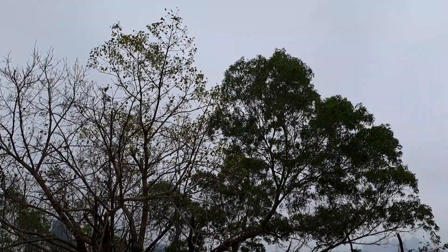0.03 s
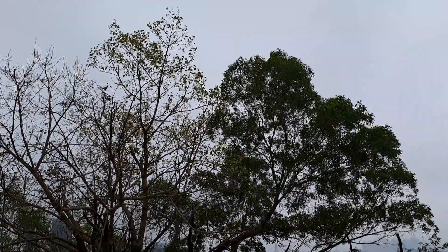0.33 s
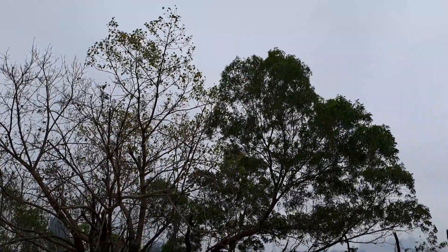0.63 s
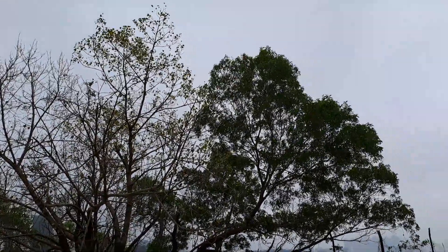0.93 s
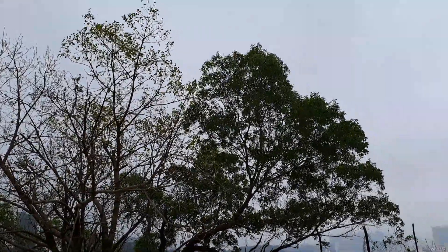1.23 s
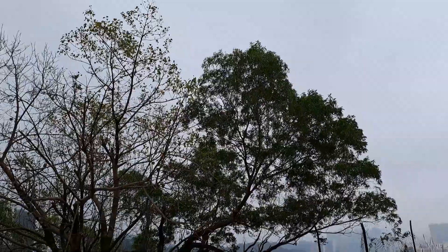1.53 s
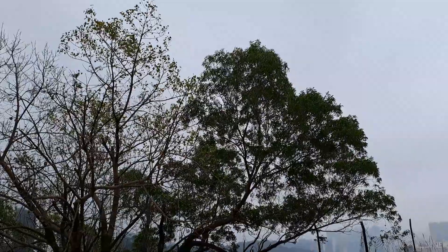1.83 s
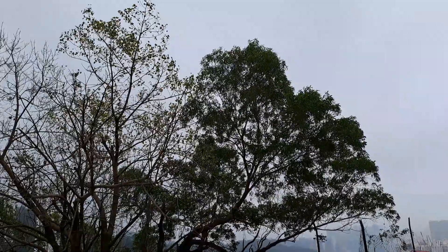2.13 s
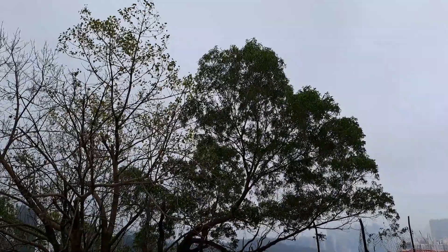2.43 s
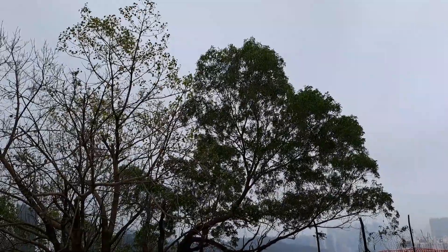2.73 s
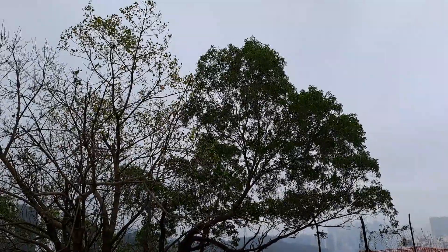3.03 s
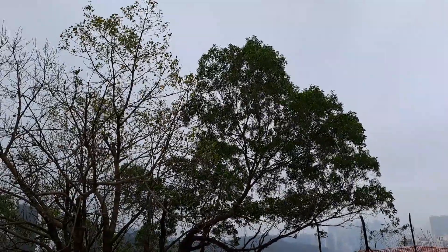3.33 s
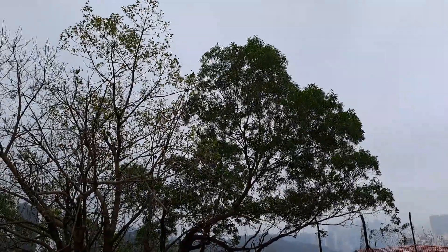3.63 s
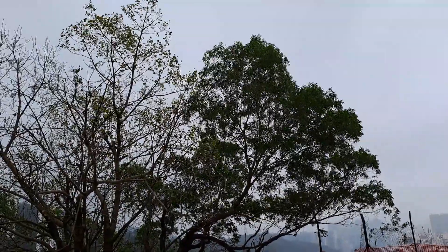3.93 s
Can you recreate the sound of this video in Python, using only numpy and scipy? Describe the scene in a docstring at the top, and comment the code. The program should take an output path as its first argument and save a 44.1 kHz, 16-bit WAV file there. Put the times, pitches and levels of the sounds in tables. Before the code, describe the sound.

Low, gusty wind buffets a hand-held microphone outdoors while leaves hiss and far traffic and an engine drone on. Faint crackles and handling ticks come before one hard gust; the wind then weakens and a vehicle draws nearer.

```python
"""On a hillside with trees above a town, far traffic roars softly over a heavy engine's drone.
A breeze hisses in the leaves and buffets the two microphone ports of a hand-held camera.
Around one second a far machine whines, fingers brush and tick on the case, dry leaves crackle
and a small bird calls faintly. At two seconds the strongest eddy hits the left port and ducks the
limiter; the bird calls again. The level dips briefly a few times, and one vehicle swells at the end."""
import sys
import numpy as np
from scipy import signal
from scipy.fft import rfft, irfft, next_fast_len
from scipy.io import wavfile
from scipy.ndimage import uniform_filter1d, minimum_filter1d, map_coordinates

SR = 44100
rng = np.random.default_rng(int(sys.argv[2]) if len(sys.argv) > 2 else 0)


def inscribe(sig):
    """Save sig as 16-bit PCM at rate SR to the path in sys.argv[1].

    A 1-D sig is mono; a 2-D sig holds one channel per row.
    Samples are clipped to [-1, 1] before scaling.
    """
    pcm = np.round(np.clip(np.atleast_2d(sig).T, -1, 1) * 32767)
    wavfile.write(sys.argv[1], SR, pcm.astype(np.int16))


N = 176400
TIME_S = np.arange(N) / SR


def amp(db):
    """Decibels to gain."""
    return 10 ** (np.asarray(db) / 20)


def unit(x):
    """Scaled to rms 1."""
    return x / np.sqrt(np.mean(x ** 2) + 1e-20)


def along(points, hz):
    """Read (freq_hz, value) points on a log frequency axis."""
    freqs, values = np.transpose(points)
    return np.interp(np.log(hz + 1), np.log(freqs + 1), values)


def eq(points):
    """A frequency response through (freq_hz, gain_db) points."""
    return lambda hz: amp(along(points, hz))


def fader(rows):
    """One value per sample for each column after the time."""
    times, *columns = np.transpose(rows)
    return np.array([np.interp(TIME_S, times, column) for column in columns])


def wobble(rate_hz):
    """A smooth random curve with rate_hz knots a second."""
    return map_coordinates(rng.standard_normal(SR // 10), [TIME_S * rate_hz + 2], mode="wrap")


def pan(pan_db):
    """Left and right gains; pan_db is always left minus right."""
    return amp(np.array([[.5], [-.5]]) * pan_db)


def filtered(x, response):
    """x shaped by a frequency response."""
    size = next_fast_len(N + SR // 2)
    return irfft(rfft(x, size) * response(np.fft.rfftfreq(size, 1 / SR)), size)[..., :N]


def noise(colour):
    """Steady coloured noise of rms 1, independent left and right."""
    return unit(filtered(rng.standard_normal((2, N)), colour))


# Stereo image of far sound at the two ports: freq_hz, correlation
FAR_IMAGE = [(200, 0.97), (400, 0.67), (720, 0.35), (900, -0.24), (1050, -0.0074), (1250, -0.79),
             (1700, -0.55), (2200, 0.44), (3000, -0.27), (3600, 0.16), (4700, -0.27), (5900, 0.35),
             (6800, -0.12), (8000, -0.016)]

def rush(colour, patchy_db, image=FAR_IMAGE):
    """Coloured stereo noise of rms 1, its gain mottled over time and frequency."""
    spectra = signal.stft(rng.standard_normal((2, N)), nperseg=1024)[2]
    patches = uniform_filter1d(rng.standard_normal(spectra.shape[1:]), size=5, axis=0)
    patches = unit(uniform_filter1d(patches, size=12, axis=1))
    pair = signal.istft(spectra * amp(patchy_db * patches), nperseg=1024)[1][:, :N]
    spread = lambda hz: np.arccos(np.clip(along(image, hz), -1, 1)) / 2
    mid, side = filtered(pair, lambda hz: colour(hz) * [np.cos(spread(hz)), np.sin(spread(hz))])
    return unit(np.array([mid + side, mid - side]))


def whine(pitch_hz, half_width_hz, patchy_db):
    """A fuzzy tone made of narrow-band stereo noise."""
    return rush(lambda hz: 1 / (1 + ((hz - pitch_hz) / half_width_hz) ** 2), patchy_db)


# Ebb and flow of the traffic bed, before its trim: time_s, level_db
TRAFFIC_FADER = [(0, -39.5), (.75, -44.5), (.95, -40), (1.2, -41), (2.0, -41), (2.4, -43.5), (2.47, -45),
                 (2.72, -43), (2.92, -44.5), (3.3, -43), (3.55, -43.5), (4, -42.5)]
# Dark tone of tyres on the road: freq_hz, gain_db
TRAFFIC_EQ = [(120, -8.5), (280, 1), (390, 2), (490, -3.5), (620, -4.5), (730, -5), (880, -7.5),
              (1100, -10), (1450, -7.5), (1750, -11.5), (2300, -14.5), (2700, -19), (3400, -18.5),
              (4000, -25), (4600, -23), (6200, -25.5), (8500, -42), (12000, -51), (15500, -52)]
# The roar leans left: freq_hz, pan_db
TRAFFIC_PAN = [(300, 2), (1200, 1), (2300, 1), (5000, 1), (8000, 0.5), (15000, 11.5)]

def traffic(trim_db=3):
    """The blended tyre roar of far roads."""
    roar = rush(eq(TRAFFIC_EQ), patchy_db=1.14)
    roar = filtered(roar, lambda hz: pan(along(TRAFFIC_PAN, hz)))
    return roar * amp(trim_db + fader(TRAFFIC_FADER) + 0.46 * wobble(14))


# The heavy engine slowly sinks away: time_s, level_db
ENGINE_FADER = [(0, -25), (.6, -28.5), (1.1, -25.5), (1.8, -26), (2.05, -30.5), (2.35, -29), (2.5, -34),
                (2.85, -33), (3.05, -30.5), (3.6, -33.5), (4, -36)]
# Partials of its drone: pitch_hz, width_hz, gain_db, pan_db
ENGINE_PARTIALS = [(51.55, 12.6, 0.5, 0.5), (83, 11.7, -8.5, 7), (170.8, 5.7, -17.5, 7),
                   (341.2, 4, -19.5, 4), (541, 5.5, -25.5, 6)]

def engine(stereo_spread=0.73):
    """A far engine drones on a few unsteady partials that swell a little differently at each port."""
    def partials(hz):
        return sum(amp(db) * pan(pan_db) * np.exp(-((hz - pitch) / (.5 * width)) ** 2) / np.sqrt(width)
                   for pitch, width, db, pan_db in ENGINE_PARTIALS)
    drive = rng.standard_normal(N) + stereo_spread * rng.standard_normal((2, N))
    return unit(filtered(drive, partials)) * amp(fader(ENGINE_FADER))


# The leaf hiss swells with the breeze, then drops suddenly near 2.43 s
# as the recorder turns it down: time_s, level_db
LEAVES_FADER = [(0, -51), (.24, -46), (.4, -48.5), (.77, -48), (.83, -46), (1.15, -49), (1.55, -48.5),
                (2.0, -49), (2.41, -46.5), (2.46, -54), (3.3, -56), (4, -53)]
# Airy tone of the leaves: freq_hz, gain_db
LEAVES_EQ = [(600, -1), (1200, 0.5), (1800, 0.5), (2230, -8), (2600, -1.5), (3400, -6.5), (3900, -10),
             (4500, -6.5), (5200, -26), (6200, -13), (6800, -27), (7500, -10.5), (8500, -41), (12000, -22),
             (15500, -46)]
# Where each band of their hiss sits: freq_hz, pan_db
FOLIAGE_PAN = [(1100, 3.5), (2100, -12), (3000, -8), (4000, -3.5), (7000, -2), (13000, 7)]

def leaves():
    """The breeze hisses in the leaves and sings unsteadily in the twigs to the right."""
    hiss = rush(eq(LEAVES_EQ), patchy_db=1.9)
    hiss = filtered(hiss, lambda hz: pan(along(FOLIAGE_PAN, hz)))
    twigs = whine(pitch_hz=2170, half_width_hz=175, patchy_db=0) * pan(-9.5)
    twigs *= amp(-5.5 + 2.5 * wobble(8.3))
    return (hiss + twigs) * amp(fader(LEAVES_FADER) + 0.81 * wobble(18))


# Gusts on the ports: time_s, left_db, right_db
GUST_FADER = [(0, -27.5, -29.5), (.2, -24, -22), (.38, -22.5, -24.5), (.52, -26, -22.5), (.68, -24.5, -23),
              (.9, -26, -28), (1.1, -22.5, -23), (1.35, -27.5, -24.5), (1.55, -25, -27), (1.9, -23.5, -28),
              (2.08, -21.5, -25), (2.2, -20, -19.5), (2.38, -22, -18), (2.47, -30, -24.5),
              (2.72, -25, -28.5), (2.82, -29.5, -29.5), (2.96, -27.5, -27.5), (3.2, -29, -29),
              (3.37, -27, -25.5), (3.48, -31, -28.5), (3.62, -31.5, -25), (3.75, -35.5, -32),
              (4, -36, -29.5)]
# Deep body of the wind: freq_hz, gain_db
RUMBLE_EQ = [(20, -42), (33, -2), (48, -5.5), (62, -0.5), (82, -0.5), (110, -3), (150, -6), (220, -11.5),
             (300, -25), (420, -31), (700, -37.5), (1500, -45), (4000, -100)]
# Low-mid flutter of finer turbulence: freq_hz, gain_db
FLUTTER_EQ = [(100, -34), (200, -2), (270, 0), (380, -8.5), (700, -17), (1500, -48), (4000, -80)]
# Stereo image of the wind: freq_hz, correlation
WIND_IMAGE = [(40, 0.63), (80, 0.49), (150, 0.39), (300, 0.35)]

def buffeting(lump_db=1.08, strong_gust_db=-21, flutter_growth=1.17):
    """Lumpy turbulence on each port; flutter grows faster than rumble, so strong gusts are brighter."""
    gust_db = fader(GUST_FADER)
    shared = wobble(21.98)
    per_port = np.array([wobble(29.98), wobble(29.86)])
    lumps = amp(lump_db * (shared + 0.39 * per_port))
    rumble = unit(lumps * rush(eq(RUMBLE_EQ), patchy_db=-0.57, image=WIND_IMAGE))
    flutter = unit(lumps * rush(eq(FLUTTER_EQ), patchy_db=1.5, image=WIND_IMAGE))
    flutter_db = -34.5 + flutter_growth * (gust_db - strong_gust_db)
    return rumble * amp(gust_db) + flutter * amp(flutter_db)


# Bright noise floor: freq_hz, gain_db
MIC_HISS_EQ = [(2000, -4.5), (5000, 1), (8000, 2), (12000, -3), (13500, -5), (15500, -15)]

def mic_hiss():
    """The even hiss of the microphones, stronger on the left."""
    return amp(-61) * pan(3) * noise(eq(MIC_HISS_EQ))


# Single wind thumps: peak_s, left_db, right_db, pitch_hz, rise_and_fall_s
EDDY_THUMPS = [(.35, -16, -16, 69.4, 0.022), (.402, -25, -15.5, 134.5, 0.013),
               (.44, -16, -14.5, 103.4, .014), (.562, -26.5, -19.5, 148, 0.013),
               (1.005, -22, -13.5, 83.7, 0.013), (1.12, -17, -25, 120, 0.015),
               (1.289, -30, -14, 91.4, 0.019), (2.021, -0.6, -33, 90.6, 0.017),
               (2.097, -9.5, -27, 138, 0.014), (2.322, -28, -15.5, 154, .016), (2.54, -25, -23, 77, 0.0081),
               (2.713, -21.5, -20, 62.3, 0.027), (3.041, -21, -22, 61.5, .016),
               (3.2, -20, -18, 66.7, 0.025), (3.372, -21.5, -18, 66, 0.019), (3.518, -23, -25, 62, .014),
               (3.618, -27, -16, 76.5, 0.0094), (3.676, -22.5, -31, 160, 0.0053),
               (3.748, -23, -27, 80, 0.0055), (3.854, -22, -25, 71, 0.0085)]

def eddies(sharpness=0.34, pitch_wander=0.198):
    """Each short whirl of air thumps the ports in a few pointed, uneven pushes."""
    out = np.zeros((2, N))
    whirl_s = np.cumsum(1 + pitch_wander * wobble(70)) / SR
    for peak_s, left_db, right_db, pitch_hz, rise_and_fall_s in EDDY_THUMPS:
        turn = np.exp(2j * np.pi * pitch_hz * (whirl_s - whirl_s[round(peak_s * SR)]))
        pushes = np.real(turn / (1 - sharpness * turn))  # harmonics sharpen each crest
        swell = np.exp(-np.abs(TIME_S - peak_s) / rise_and_fall_s)
        out += amp([[left_db], [right_db]]) * swell * pushes
    return out


# A far machine drifts in and out: time_s, level_db
MACHINE_FADER = [(0, -67), (.7, -67), (.92, -49.5), (1.7, -55), (2.1, -61), (3.6, -74), (3.84, -57),
                 (4, -55)]

def machine():
    """A thin whine to the left that comes and goes on the wind."""
    tone = whine(pitch_hz=1358, half_width_hz=26, patchy_db=1.5)
    return tone * pan(6.5) * amp(fader(MACHINE_FADER))


# Soft finger strokes: peak_s, level_db, half_length_s
FINGER_BRUSHES = [(.862, -61, .012), (0.915, -66, .05), (1.995, -63, .01), (2.78, -65, 0.015)]
# Silky top of skin sliding on the case: freq_hz, gain_db
SKIN_EQ = [(4000, -17), (8000, -9), (12000, 5), (15500, 3)]
# Finger ticks: start_s, peak_db, pan_db
FINGER_TICKS = [(.866, -43, -5), (1.385, -48, -6), (1.62, -52, 7), (1.9862, -29.5, -5), (1.9945, -43, -2)]
# Crisp tone of the tapped case: freq_hz, gain_db
CASE_EQ = [(3000, -18), (6200, -1), (8000, -9), (10300, 1), (12000, -2), (15500, -15)]

def fingers(tick_decay_s=0.00053):
    """Fingers brush softly and tick on the camera's case."""
    # One snap, built at 1 s and slid to each tick.
    snap = rng.standard_normal((2, N)) * (TIME_S >= 1) * np.exp(-np.abs(TIME_S - 1) / tick_decay_s)
    snap = filtered(snap, eq(CASE_EQ))
    snap /= np.abs(snap).max()
    ticks = sum(amp(db) * pan(pan_db) * np.roll(snap, round((start_s - 1) * SR), axis=1)
                for start_s, db, pan_db in FINGER_TICKS)
    strokes = sum(amp(db) * np.exp(-.5 * ((TIME_S - peak_s) / half_length_s) ** 2)
                  for peak_s, db, half_length_s in FINGER_BRUSHES)
    return ticks + strokes * pan(-4) * noise(eq(SKIN_EQ))


# Dry leaf accents: start_s, level_db, pan_db, decay_s
LEAF_CRACKLES = [(.932, -39, 2, 0.01), (.973, -47, -6, .012), (1.108, -45, 2, .005), (1.615, -43, 1, 0.022),
                 (2.764, -44, 4, .012)]
# Their papery midrange: freq_hz, gain_db
CRACKLE_EQ = [(700, -15), (1200, 5), (2200, 1), (3000, -3), (4500, -13), (8000, -29), (15500, -44)]

def crackles():
    """Dry leaves crackle in the gusts, each a sudden burst that dies fast."""
    bursts = sum(amp(db) * pan(pan_db) * (TIME_S >= start_s) * np.exp(-np.abs(TIME_S - start_s) / decay_s)
                 for start_s, db, pan_db, decay_s in LEAF_CRACKLES)
    return bursts * noise(eq(CRACKLE_EQ))


# Two faint chirps: start_s, length_s, start_hz, end_hz, level_db
BIRD_CALLS = [(0.998, .14, 8260, 6960, -66), (2.2, 0.17, 7900, 7300, -63.5)]

def bird():
    """A small bird's thin falling calls, blurred by the trees."""
    out = np.zeros((2, N))
    for start_s, length_s, start_hz, end_hz, db in BIRD_CALLS:
        progress = np.clip((TIME_S - start_s) / length_s, 0, 1)
        phase = 2 * np.pi * np.cumsum(start_hz + (end_hz - start_hz) * progress) / SR
        blur = 2 * np.array([wobble(800), wobble(800)])
        out += amp(db) * np.sin(np.pi * progress) * np.sin(phase) * blur
    return out


# Quick dips in the bass beds: centre_s, depth_db, half_length_s
LEVEL_DIPS = [(2.467, 5, 0.017), (2.659, 17, 0.012), (2.809, 11, 0.036), (3.103, 5.5, 0.016),
              (3.572, 9, .01), (3.708, 6, 0.012)]

def dips():
    """The level sinks briefly and comes back; gives the depth in dB at each sample."""
    return sum(depth_db * np.exp(-.5 * ((TIME_S - centre_s) / half_length_s) ** 2)
               for centre_s, depth_db, half_length_s in LEVEL_DIPS)


# The nearer vehicle's closing swell: time_s, level_db
VEHICLE_FADER = [(0, -66), (3.2, -58), (3.55, -51.5), (3.77, -44), (3.85, -39), (3.94, -40), (4, -37)]
# Resonances that colour its roar: pitch_hz, width_hz, gain_db
VEHICLE_RESONANCES = [(301, 20, 8.5), (496, 60, -0.5), (643, 58, -6), (775, 44, -6.5), (1000, 150, -6),
                      (1400, 180, -3), (1630, 160, -5.5), (2060, 200, -13), (2820, 340, -13),
                      (3500, 220, -20)]
# Its tyres whine as it comes close: time_s, level_db
TYRE_FADER = [(3.1, -82), (3.76, -56), (3.85, -46), (3.93, -37), (4, -43)]

def vehicle(air_cutoff_hz=5200):
    """One vehicle draws nearer with a resonant roar and a tyre whine; the air takes its treble."""
    def colour(hz):
        power = sum(amp(db) ** 2 / (1 + ((hz ** 2 - pitch ** 2) / (hz * width + 1)) ** 2)
                    for pitch, width, db in VEHICLE_RESONANCES)
        return np.sqrt(power / (1 + (hz / air_cutoff_hz) ** 4))
    roar = rush(colour, patchy_db=3.5) * amp(fader(VEHICLE_FADER) + 1.1 * wobble(16))
    tyres = whine(pitch_hz=747, half_width_hz=98, patchy_db=3) * amp(fader(TYRE_FADER))
    return roar + tyres


def scene(low_cut_hz=34, far_dip_share=0.28):
    """The mix at the two ports; the microphones pass little of the bass below the low cut."""
    dip_db = dips()
    far = (traffic() + vehicle() + machine() + leaves()) * amp(-far_dip_share * dip_db)
    bass = (engine() + buffeting()) * amp(-dip_db) + eddies()
    bass = filtered(bass, lambda hz: hz ** 4 / np.sqrt(hz ** 8 + low_cut_hz ** 8))
    return far + bass + crackles() + fingers() + bird() + mic_hiss()


def record(dry):
    """A limiter ducks at once and recovers slowly; nothing passes above the band limit."""
    ceiling, release_db_per_s, band_limit_hz = 0.95, 2, 15720
    over_db = np.maximum(20 * np.log10(np.abs(dry).max(axis=0) / ceiling + 1e-9), 0)
    release_db = release_db_per_s * TIME_S
    duck_db = np.maximum.accumulate(over_db + release_db) - release_db
    gain = uniform_filter1d(minimum_filter1d(amp(-duck_db), size=200), size=200)  # soft look-ahead
    return filtered(dry * gain, lambda hz: hz < band_limit_hz)


dry = scene()
out = record(dry)
inscribe(out)
```